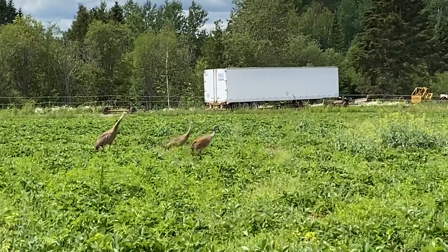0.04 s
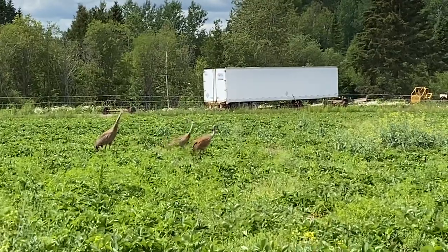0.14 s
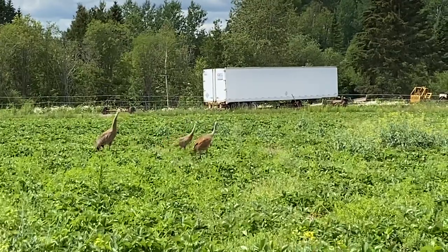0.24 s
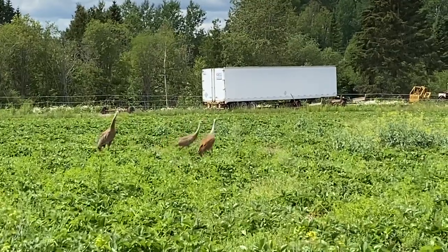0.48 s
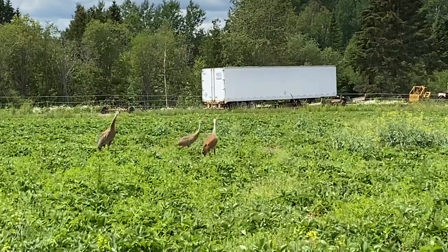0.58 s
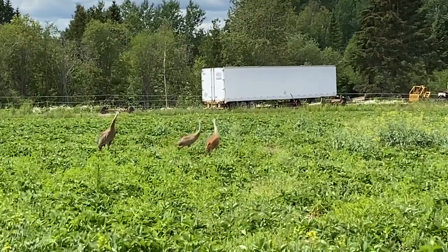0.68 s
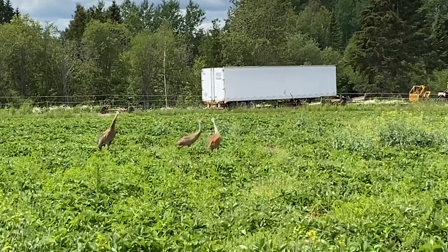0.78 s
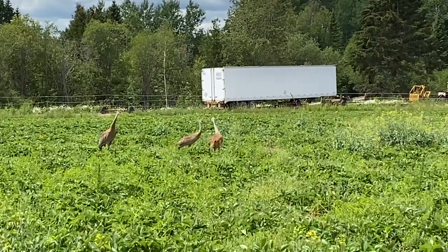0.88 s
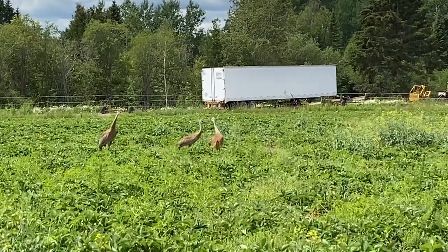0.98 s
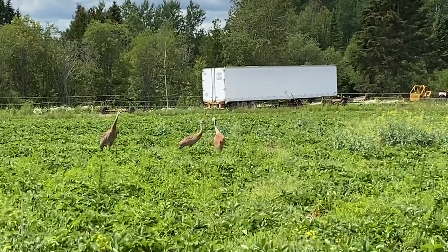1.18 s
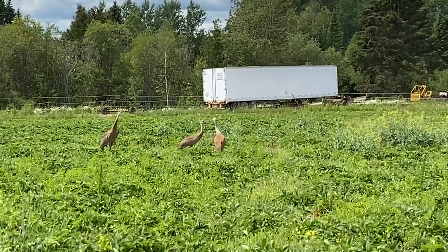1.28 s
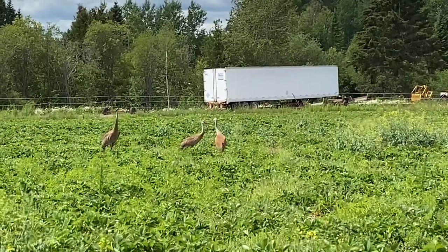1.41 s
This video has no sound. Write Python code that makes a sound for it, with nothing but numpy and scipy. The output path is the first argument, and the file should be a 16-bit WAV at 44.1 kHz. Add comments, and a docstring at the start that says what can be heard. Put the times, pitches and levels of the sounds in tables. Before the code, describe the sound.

Cranes give a loud rattling call and falling yelps outdoors, over light wind.

```python
"""Two cranes calling in a field

One crane opens with a rising, buzzy note, then rattles: each hard knock is a quick run of pulses over
a brief throat tone. The other joins with a clear note, then short falling yelps that drift into step
with the knocks as both fade. Their voices are stacks of harmonics with puffs of breath, scattered by
leaves and trees. Light wind rumbles and bumps on the microphone over a faint hiss."""
import sys
import numpy as np
from scipy import signal
from scipy.fft import rfft, irfft, next_fast_len
from scipy.io import wavfile

SR = 44100
rng = np.random.default_rng(int(sys.argv[2]) if len(sys.argv) > 2 else 0)


def master_out(mix):
    """Clip the mix to full scale and print it as 16-bit PCM to the path in sys.argv[1]."""
    frames = np.transpose(np.atleast_2d(mix))
    ceiling = np.clip(frames, -1, 1)
    pcm = np.round(ceiling * 32767).astype(np.int16)
    wavfile.write(sys.argv[1], SR, pcm)


N = 63945
TIME = np.arange(N) / SR
FFT_SIZE = 2 * next_fast_len(N)
FFT_HZ = np.fft.rfftfreq(FFT_SIZE, 1 / SR)
CUTOFF_HZ = 16800
LEFT_MINUS_RIGHT = np.array([[1], [-1]])


def from_db(db):
    """Turn decibels into a number to multiply by."""
    return 10 ** (np.asarray(db) / 20)


def rms_one(x):
    """Scale a signal so its average strength (rms) is one."""
    return x / np.sqrt(np.mean(x ** 2) + 1e-20)


def at_hz(points, hz):
    """Read between the rows of a frequency table, with octaves evenly spaced."""
    row_hz, value = np.transpose(points)
    return np.interp(np.log(np.maximum(hz, 1)), np.log(row_hz), value)


def colour(x, points):
    """Turn frequencies up or down by a table, with no ringing ahead of the sound (minimum phase)."""
    cepstrum = irfft(np.log(from_db(at_hz(points, FFT_HZ))))
    cepstrum[1:FFT_SIZE // 2] *= 2
    cepstrum[FFT_SIZE // 2 + 1:] = 0
    return irfft(rfft(x, FFT_SIZE) * np.exp(rfft(cepstrum)))[..., :N]


def noise(points):
    """Noise of strength one, shaped by a frequency table."""
    return rms_one(colour(rng.standard_normal(N), points))


def drift(rate_hz):
    """A smooth random wobble of strength one."""
    lowpass = signal.butter(2, rate_hz, fs=SR, output="sos")
    return rms_one(signal.sosfilt(lowpass, rng.standard_normal(N)))


def hiss():
    """A faint steady hiss, a little different on the left and right."""
    # hiss common to both sides: frequency_hz, gain_db
    middle_timbre = [(30, -7), (400, -0.5), (850, 4), (1300, -13), (2000, -10.5), (3300, -11), (5500, -16),
                     (8000, -27), (16000, -42)]
    # hiss that differs between the sides: frequency_hz, gain_db
    side_timbre = [(30, -34), (150, -21), (400, -24.5), (850, -1), (1300, -4), (3300, -29), (8000, -41),
                   (16000, -18)]
    return from_db(-56.5) * noise(middle_timbre) + from_db(-62.5) * noise(side_timbre) * LEFT_MINUS_RIGHT


def wind(bump_attack_s=0.0019, bump_decay_s=0.0066):
    """Wind on the microphone makes a gusty rumble and short, dull bumps."""
    # strength of the wind: time_s, level_db
    gusts = [(0, -41.5), (.035, -48), (.29, -51.5), (.314, -46.5), (.40, -44.5), (.55, -47.5), (.65, -54.5),
             (.766, -41.5), (.81, -50), (.868, -33.5), (.93, -48), (.98, -44), (1.07, -46.5), (1.12, -44.5),
             (1.32, -43), (1.348, -55), (1.384, -42.5), (1.45, -45)]
    # tone of the rumble: frequency_hz, gain_db
    rumble_timbre = [(20, -22), (40, -5), (65, 2.5), (120, -7.5), (220, -12.5), (400, -17.5), (800, -46.5),
                     (1500, -42), (4000, -54.5)]
    # soft bumps: start_s, level_db
    bumps = [(.198, -40.5), (0.309, -40), (1.004, -42.5), (1.144, -33.5), (1.173, -40.5), (1.187, -36.5),
             (1.2, -43), (1.229, -38), (1.242, -40), (1.302, -37.5), (1.377, -47), (1.405, -39.5)]
    # tone of the bumps: frequency_hz, gain_db
    bump_timbre = [(40, -28), (200, 3), (450, -2), (950, -4.5), (1400, -26.5), (2500, -46), (8000, -48)]
    rumble = from_db(np.interp(TIME, *np.transpose(gusts))) * noise(rumble_timbre)
    bump_gain = np.zeros(N)
    for start_s, level_db in bumps:
        t = TIME - start_s
        attack = np.clip(t / bump_attack_s, 0, 1)
        bump_gain += from_db(level_db) * attack * np.exp(-abs(t) / bump_decay_s)
    return rumble + bump_gain * noise(bump_timbre)


def thuds(width_cycles=0.47):
    """Air hits the microphone; each low thud is one brief swing of pressure."""
    # thuds of air: peak_s, level_db, pitch_hz
    hits = [(0.862, -28, 216), (0.876, -26, 137), (0.896, -24, 114.5), (0.928, -29, 73), (1.012, -38, 155),
            (1.0640, -28, 100), (1.173, -33, 152), (1.2530, -36, 126), (1.39, -32, 68.6)]
    out = np.zeros(N)
    for peak_s, level_db, pitch_hz in hits:
        cycles = (TIME - peak_s) * pitch_hz
        out += from_db(level_db) * np.exp(-(cycles / width_cycles) ** 2) * np.cos(2 * np.pi * cycles)
    return out


def microphone_ports(x):
    """The microphone's two openings hear the same sound with its waves shifted, giving stereo."""
    # how far the left opening is ahead of the right: frequency_hz, lead_radians
    phase_lead = [(20, 0), (600, .05), (730, .2), (790, .65), (865, 1.7), (905, 1.3), (950, .15),
                  (1060, -.27), (1400, -.03), (2100, -.03), (2480, .6), (3000, .25), (4200, .03),
                  (7300, -.1), (9000, -3.1), (11000, -5.9), (13300, -9.4), (15400, -12.4)]
    shift = np.exp(.5j * at_hz(phase_lead, FFT_HZ) * LEFT_MINUS_RIGHT)
    return irfft(rfft(x, FFT_SIZE) * shift)[:, :N]


def foliage_echo(x, fade_s):
    """Foliage scatters sound into a soft tail with little bass, falling 60 dB in fade_s."""
    # what the foliage sends back: frequency_hz, gain_db
    timbre = [(300, -24), (800, -9), (1400, 0), (3300, 0), (7000, -6), (16000, -10)]
    t = TIME[:N // 2]
    tail = rng.standard_normal(len(t)) * from_db(-60 * t / fade_s)
    tail /= np.sqrt(np.sum(tail ** 2))
    return colour(signal.fftconvolve(x, tail)[:N], timbre)


def voice(pitch_hz, gain, timbre, roughness, brightness=0, jitter=0.16, breath_db=-6.5):
    """A crane's voice pulses as a stack of harmonics; roughness adds pitch wobble and puffs of air."""
    # air noise in the voice: frequency_hz, gain_db
    breath_timbre = [(400, -34.5), (750, -5), (1100, -2.5), (1600, 8.5), (2400, -14.5), (3400, 2.5),
                     (4500, -21.5), (7500, -15), (16000, -20.5)]
    on = gain > 0
    roughness = np.clip(roughness, 0, 1)
    wobbly_hz = pitch_hz * (1 + jitter * roughness * drift(rate_hz=595))
    phase = 2 * np.pi * np.cumsum(wobbly_hz[on]) / SR
    harmonic = np.arange(1, 2 + CUTOFF_HZ // pitch_hz[on].min())[:, None]
    harmonic_hz = harmonic * pitch_hz[on]
    tilt_db = (brightness * on)[on] * np.log2(harmonic)
    strengths = from_db(at_hz(timbre, harmonic_hz) + tilt_db) * (harmonic_hz < CUTOFF_HZ)
    tone = np.sum(strengths * np.cos(harmonic * phase), axis=0)
    tone /= np.sqrt(np.sum(strengths ** 2, axis=0) / 2)
    puffs = (roughness * noise(breath_timbre))[on] * (1 + np.cos(phase))  # one puff per cycle
    out = np.zeros(N)
    out[on] = gain[on] * (tone + from_db(breath_db) * puffs)
    return out


def held_note(curve, timbre):
    """One unbroken note that glides in pitch, level, brightness and roughness."""
    times, *columns = np.transpose(curve)
    pitch_hz, level_db, brightness, roughness = [np.interp(TIME, times, column) for column in columns]
    gain = from_db(level_db) * (TIME > times[0]) * (TIME < times[-1])
    return voice(pitch_hz, gain, timbre, roughness, brightness)


def answering_note():
    """The second crane joins in with a clear note."""
    # path of the note: time_s, pitch_hz, level_db, brightness_db_per_octave, roughness (0 is clear)
    curve = [(.352, 603.3, -44, -14, 0.63), (.373, 623.5, -33.5, -1.5, 0.17), (.382, 629.4, -34, 8, .08),
             (.394, 641, -28, -0.5, 0.07), (.412, 640, -29.5, 5, 0.06), (.426, 626.6, -31, -4, 0.2),
             (.436, 582, -48, 20, 0.2)]
    # tone of the note: frequency_hz, gain_db
    timbre = [(635, -14), (1270, -2.5), (1900, -7), (2550, -19.5), (3180, -13), (3800, -18.5),
              (5000, -32.5), (7000, -43), (16000, -56)]
    return held_note(curve, timbre)


def yelps(attack_s=0.00233, hold_s=0.027, release_s=0.013, fade_db_per_s=362, sag_hz_per_s=2600):
    """The second crane's yelps start hard and clear, then break lower and hoarser as they fade."""
    # the yelps: start_s, pitch_hz, level_db, roughness (0 is clear), break_after_s
    calls = [(0.4966, 1011, -19.5, 0.31, 0.01), (0.5655, 1015, -18.5, 0.17, 0.0122),
             (.6302, 1011, -19, 0.17, .012), (.6885, 1004, -19.5, 0.22, 0.012),
             (0.7427, 996, -22, 0.31, 0.0081), (.7935, 982, -27, 0.31, 0.012)]
    # tone of a yelp: frequency_hz, gain_db
    timbre = [(700, 7), (1000, -3), (1650, -7.5), (2000, -12), (2600, -23), (3300, -21), (4100, -24),
              (5200, -31.5), (8000, -45), (16000, -51)]
    # filter that thins the bass: frequency_hz, gain_db
    low_cut = [(350, -15.5), (520, -8), (700, -1), (16000, -2)]
    break_drop_hz, break_s, break_roughness = 109.4, 0.0016, 0.28
    out = np.zeros(N)
    for start_s, pitch_hz, level_db, roughness, break_after_s in calls:
        t = np.clip(TIME - start_s, 0, hold_s + release_s)
        release = 1 - (TIME - start_s - hold_s) / release_s
        gate = np.clip(np.minimum(t / attack_s, release), 0, 1)
        gain = gate * from_db(level_db - fade_db_per_s * t)
        broken = .5 + .5 * np.tanh((t - break_after_s) / break_s)  # goes from 0 to 1 at the break
        falling_hz = pitch_hz - sag_hz_per_s * t - break_drop_hz * broken
        out += voice(falling_hz, gain, timbre, roughness + break_roughness * broken)
    return colour(out, low_cut)


def opening_note():
    """The first crane opens with a rising, buzzy note."""
    # path of the note: time_s, pitch_hz, level_db, brightness_db_per_octave, roughness (0 is clear)
    curve = [(.193, 481, -47.5, -6, 0.6), (.204, 486, -53, -1, 0.26), (.211, 500.8, -36.5, -4, 0.17),
             (.235, 521.3, -35, 1, 0.01), (.262, 543.6, -27, 4.5, 0.08), (.269, 548.5, -30, 2, 0.06),
             (.277, 519, -31.5, -1, 0.54), (.283, 494, -44, -4, 0.9), (.305, 497, -64.5, -12, 1.1)]
    # tone of the note: frequency_hz, gain_db
    timbre = [(520, -12.5), (1060, 2), (1600, -2), (2150, -8), (2700, -7), (3800, -15.5), (7500, -22.5),
              (16000, -29.5)]
    return held_note(curve, timbre)


def throat_tone(start_s, level_db, pitch_hz, peak_s=0.00477, width_s=0.0027, sag_hz_per_s=15500):
    """In each knock a falling throat tone swells and dies, then echoes twice, over a soft murmur."""
    murmur_db, murmur_s = -28, 0.017
    echo_s, echo_db = 0.0083, -9
    age = TIME - start_s
    murmur_gain = from_db(level_db + murmur_db) * np.exp(-(age / murmur_s) ** 2)
    out = murmur_gain * np.cos(2 * np.pi * pitch_hz * (age - peak_s))
    for trip in range(3):
        t = age - peak_s - trip * echo_s
        swell = from_db(level_db + trip * echo_db) * np.exp(-(t / width_s) ** 2)
        tone = np.cos(2 * np.pi * (pitch_hz - sag_hz_per_s * t / 2) * t)
        out += (-1) ** trip * swell * tone  # each echo flips the wave over
    return out


def snap(start_s, slap_delay_s, pulses=5, gap_s=.00118, slowing=.02, loss_db=4.5, slap_db=-4):
    """The hard edge of a knock: a slowing run of sharp pulses and a last slap, with a noisy rasp."""
    rasp_db, rasp_lead_s, rasp_attack_s, rasp_decay_s = -16, 0.0015, 0.0017, .006
    pulse = np.arange(pulses)
    delays_s = gap_s * pulse * (1 + slowing * pulse * rng.normal(1, 0.24, pulses))
    times = start_s + np.append(delays_s, slap_delay_s)
    pulse_db = -loss_db * abs(pulse - 1)  # peaks on the second pulse
    levels_db = np.append(pulse_db, slap_db) + rng.normal(0, 1, pulses + 1)
    t = TIME - start_s
    rasp_shape = np.clip((t + rasp_lead_s) / rasp_attack_s, 0, 1) * np.exp(-abs(t) / rasp_decay_s)
    out = from_db(rasp_db) * rasp_shape * rng.standard_normal(N)
    out[(times * SR).astype(int)] += from_db(levels_db)
    return out


def rattle(dull_db_per_octave=10.5, snap_mix_db=-6):
    """The first crane's run of knocks, each a snap plus a throat tone; the last are softer and duller."""
    # the knocks: start_s, throat_db, throat_hz, snap_db, dull_above_hz, slap_delay_s
    knocks = [(.3616, -15.5, 820, 0, 14900, 0.0048), (.4309, -14.5, 814, -1, 15100, 0.008),
              (.4899, -15.5, 812, -0.5, 15000, .0092), (.5430, -13.5, 824, 1, 14500, 0.0075),
              (.5979, -14.5, 827, -2, 14000, .0093), (.6497, -13.5, 828, 0, 15600, .0078),
              (.7003, -20.5, 745, -2, 12800, .0057), (.7460, -21, 795, -7.5, 2600, 0.0069),
              (.7950, -20.5, 915, -11, 2700, 0.012), (.8440, -22, 855, -7, 2220, 0.0097)]
    # tone of the snaps: frequency_hz, gain_db
    snap_timbre = [(200, -34), (500, -14), (800, 12), (1100, 8.5), (1350, 8.5), (1600, 11), (1800, -5),
                   (2150, 4.5), (2550, 2.5), (2950, 2.5), (3350, 7.5), (3800, -2), (4400, -3), (7000, -5),
                   (11000, -8.5), (16000, -8)]
    snaps, throat = np.zeros(N), np.zeros(N)
    for start_s, throat_db, throat_hz, snap_db, dull_above_hz, slap_delay_s in knocks:
        dulling = [(dull_above_hz * 2 ** octave, -dull_db_per_octave * octave) for octave in range(3)]
        snaps += from_db(snap_db) * colour(snap(start_s, slap_delay_s), dulling)
        throat += throat_tone(start_s, throat_db, throat_hz)
    return throat + from_db(snap_mix_db) * colour(snaps, snap_timbre)


def scene():
    """Both cranes, their echoes from near leaves and far trees, then wind and hiss."""
    cranes = opening_note() + rattle() + answering_note() + yelps()
    leaves = from_db(-14) * foliage_echo(cranes, fade_s=.045)
    trees = from_db(-26) * foliage_echo(cranes, fade_s=.4)
    background = hiss() + wind() + thuds()
    return microphone_ports(cranes + leaves + trees) + background


def record(dry):
    """The microphone colours the sound, and the highest treble is cut away."""
    # microphone response: frequency_hz, gain_db
    response = [(20, 1), (7600, 1.5), (8400, -2.5), (9000, -7), (9900, -0.5), (11500, -1.5), (13200, -5),
                (14400, -3.5), (15500, -5), (16500, -18)]
    lowpass = signal.cheby2(14, 60, CUTOFF_HZ + 400, fs=SR, output="sos")
    return signal.sosfilt(lowpass, colour(dry, response))


dry = scene()
out = record(dry)
master_out(out)
```